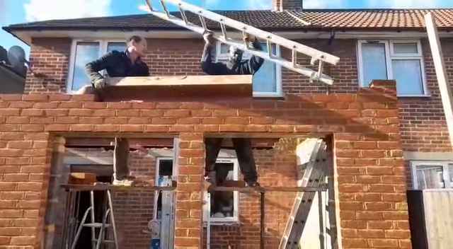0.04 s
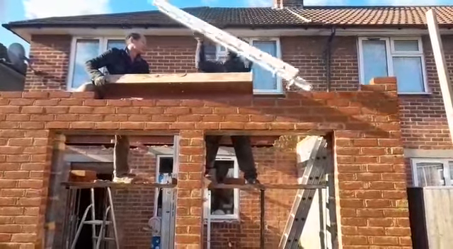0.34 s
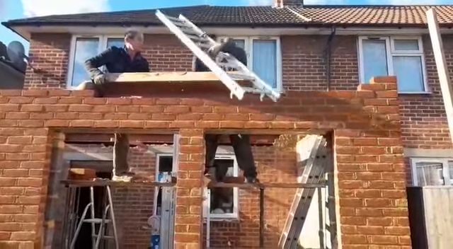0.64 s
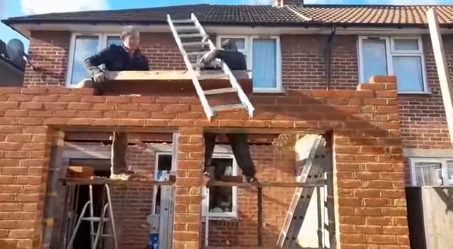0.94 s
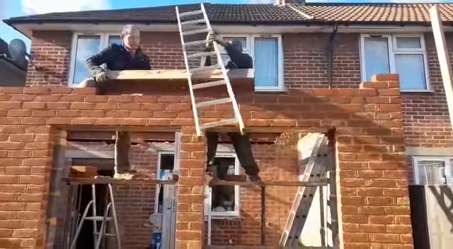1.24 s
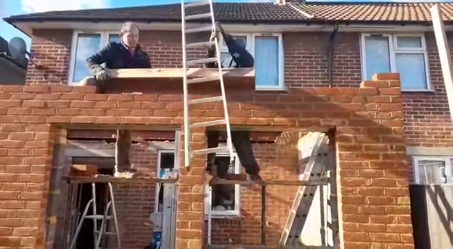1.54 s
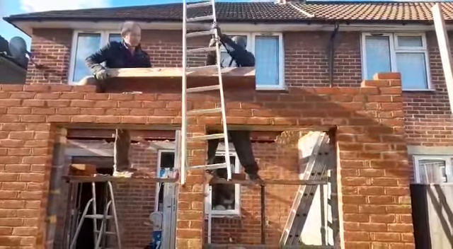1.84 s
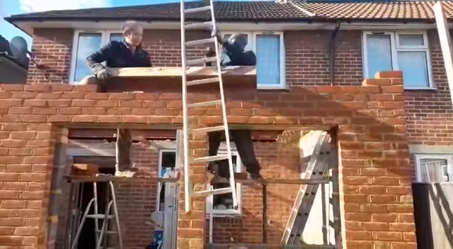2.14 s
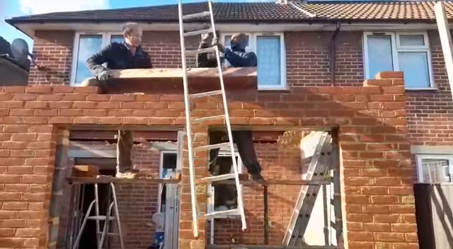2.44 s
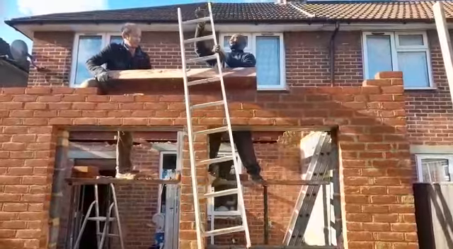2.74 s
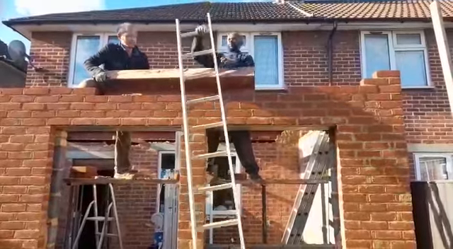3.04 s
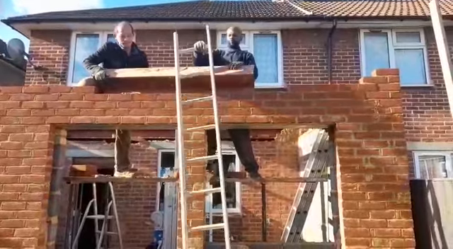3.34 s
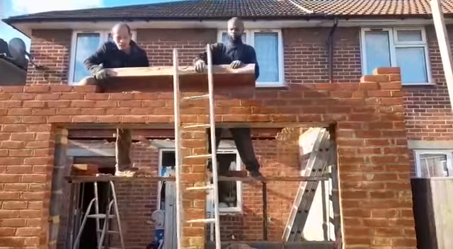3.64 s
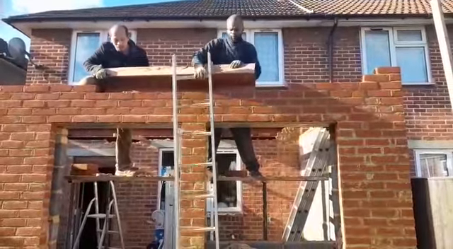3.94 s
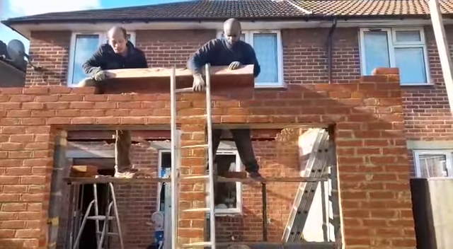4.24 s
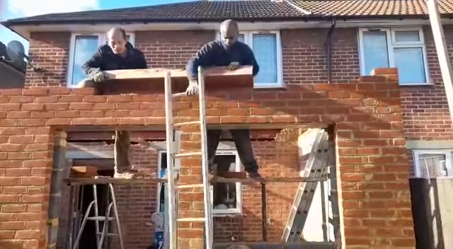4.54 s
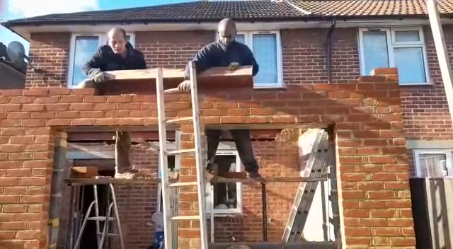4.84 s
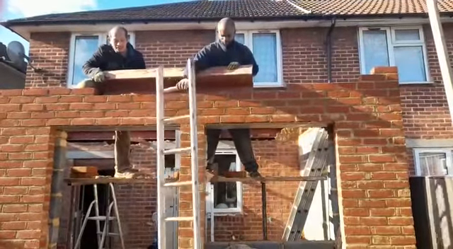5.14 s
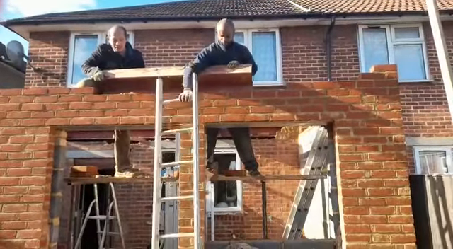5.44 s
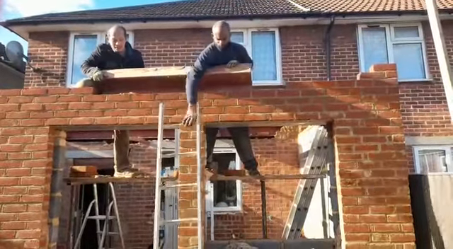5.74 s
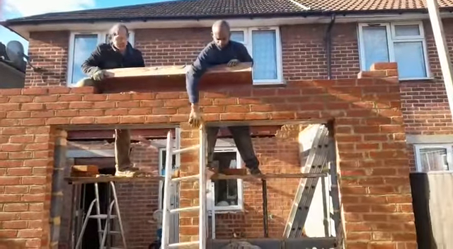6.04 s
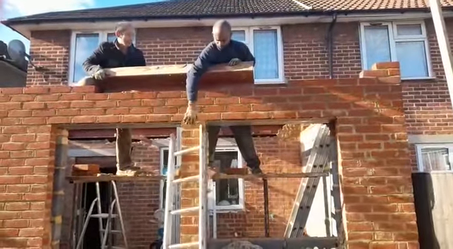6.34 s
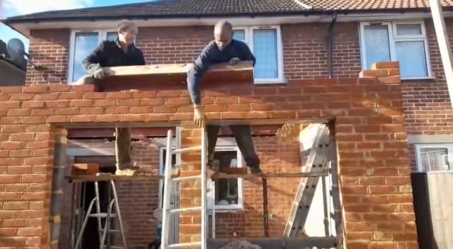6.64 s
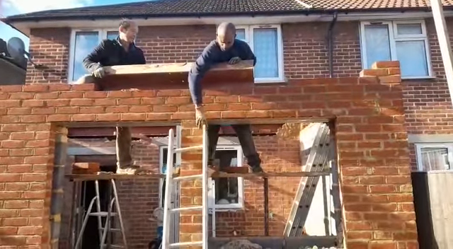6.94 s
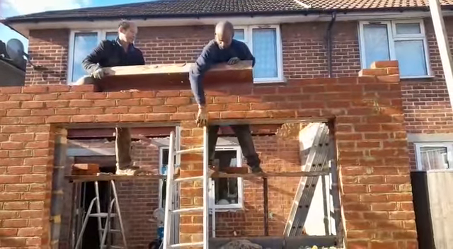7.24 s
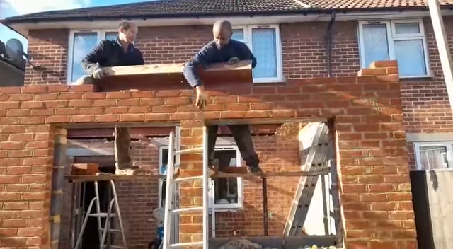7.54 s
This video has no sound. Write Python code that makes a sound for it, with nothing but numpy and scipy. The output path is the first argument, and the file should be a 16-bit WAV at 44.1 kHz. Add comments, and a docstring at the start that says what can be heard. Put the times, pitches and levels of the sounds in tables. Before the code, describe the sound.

Ringing metal knocks open the scene as an aluminium ladder bumps a brick wall, then rasps and rattles down it to a hard clank. Lighter knocks and dull boot thumps on boards follow. The ladder hits the ground with a thud and a bouncing clatter, scuffs briefly and settles with a few short clanks. It is heard in stereo in a walled yard, with faint town hum, hiss and low rumble underneath.

```python
"""A building site: an aluminium ladder is lowered over a brick wall.
Knocks ring its hollow rails and its rung joints tick. The rails scrape down the bricks in tiny
slips, crushing grains, chipping edges and snagging on mortar. Scaffold boards thump under boots.
The feet land with a boom and the ladder clanks into place. The yard walls add a short echo;
distant town, hiss and a low rumble lie underneath."""
import sys
import numpy as np
from scipy import signal
from scipy.fft import rfft, irfft
from scipy.io import wavfile
from scipy.ndimage import map_coordinates

SR = 44100
rng = np.random.default_rng(int(sys.argv[2]) if len(sys.argv) > 2 else 0)


def output_pcm(signal):
    """Save a mono or channel-first signal as 16-bit PCM at the path in sys.argv[1].

    Samples are clipped to [-1, 1] before scaling.
    """
    pcm = np.clip(np.atleast_2d(signal).T, -1, 1) * 32767
    wavfile.write(sys.argv[1], SR, np.round(pcm).astype(np.int16))


N = 334719
LN_1000 = np.log(1000)  # 60 dB of decay

# Likeness of the left and right channels. Each row: frequency in Hz, coherence 0-1.
COHERENCE = [(50, 0.74), (150, 0.35), (500, 0.71), (1500, 0), (5000, 0.11), (14000, 0)]
# Distant town and hiss. Each row: frequency in Hz, relative level in dB.
AIR_SPECTRUM = [(15, -56), (25, -16.5), (70, -2), (170, -15), (335, -8.5), (641, -21), (714, -21),
                (1160, -27), (2350, -24), (2610, -24), (2840, -26.5), (6210, -18), (8590, -32.5),
                (12900, -17.5), (16000, -28.5)]
# Treble of that background. Each row: time in seconds, gain in dB.
HISS_CURVE = [(.2, -5), (.6, -8.5), (.88, -7.5), (1.3, -4.5), (4.8, -2.5), (5, -10.5), (5.3, -5.5),
              (7.3, 0), (7.59, -13.5)]
# Low rumble. Each row: time in seconds, relative level in dB.
RUMBLE_CURVE = [(0.0, -55.5), (0.59, -65.5), (1.24, -42), (2.68, -59.5), (3.63, -53.5), (4.2, -62.5),
                (6.04, -60), (6.15, -52), (6.98, -72), (7.59, -88)]
# Ladder knocks on wall and boards. Each row: start in seconds, relative level in dB, brightness in dB,
# frequency favoured by the contact point in Hz, clear ring in dB, looseness as a decay time factor.
LADDER_KNOCKS = [(.3, -55, -10, 1750, 14.5, 1.6), (0.373, -49, -20, 2660, 19.5, 3.6),
                 (.936, -19.5, -13.5, 1085, -11, 1.02), (1.139, -16.5, -16, 1360, -3.5, 1.6),
                 (1.299, -20, -10.5, 5416, 10, 0.98), (1.361, -28, -6, 928, -1, 0.73),
                 (1.453, -22, -11, 928, 1, 0.48), (1.535, -28, -12, 1118, 7, .6),
                 (2.014, -34, -20, 1085, 14.5, 0.36), (2.16, -27.5, -10, 1265, 6, .6),
                 (2.295, -31, 3, 3950, 18, 0.49), (2.417, -21, -1, 3950, 12, 0.37),
                 (2.595, -23.5, 1, 2067, 9, 0.24), (2.932, -29, -7.5, 2137, 2, 0.33),
                 (2.954, -28.5, 1.5, 6169, 8, 0.42), (3.029, -18.5, -7, 1265, 2, 0.43),
                 (3.092, -18.5, -1, 1455, -3, 0.66), (3.146, -26, -20, 1455, -4, 0.98),
                 (3.243, -36, -15, 2067, 15.5, 0.78), (3.298, -38, -11, 2600, 22.5, 1.3),
                 (3.435, -32, -2, 1265, 7.5, 1.2), (3.499, -36.5, -8, 1265, 14.5, 1.1),
                 (3.56, -33, -14, 1380, 10, 0.98), (3.585, -29.5, -7, 2600, 9, 0.8),
                 (3.753, -22.5, -7, 678, -6, 0.85), (3.798, -5, -17.5, 1455, -1, 0.58),
                 (3.804, -20, -24, 1114, 10, 0.51), (3.829, -15.5, -16.5, 2138, 12.5, 0.38),
                 (3.832, -26.5, -24, 735, 5, 1.24), (3.843, -33, -9, 922, 9, 1.2),
                 (3.876, -30, -10.5, 6585, 20, 0.74), (4.161, -17, -18.5, 1455, -13, 0.98),
                 (4.228, -19, -21, 1085, -1, 0.8), (4.241, -26.5, -27, 1455, 6, 0.7),
                 (4.334, -34.5, -10, 2995, -1, 0.56), (4.366, -33, -18, 2467, -11, 0.43),
                 (4.584, -35, -7.5, 2467, -5, 0.28), (4.661, -42.5, -10, 2467, -2, 0.2),
                 (4.685, -29, -10, 743, -4.5, 0.81), (5.087, -50.5, 4, 4400, 6.5, 1),
                 (5.44, -49, -12, 743, 12, 0.63), (5.892, -41.5, -8, 928, 6, 2.1),
                 (6.004, -17, -12.5, 2067, -7, 1.8), (6.03, -17, -18.5, 1600, -1, 1.9),
                 (6.088, -29, -18, 678, 10, 2.4), (6.113, -14.5, -15, 1114, -1.5, 1.53),
                 (6.219, -16.5, -11, 1114, 3, 0.92), (6.226, -24, -18.5, 4090, 21, 0.65),
                 (6.234, -32, -22, 1380, 18, 0.5), (6.269, -29, -5, 1118, 8, 1.2),
                 (6.435, -32.5, -12, 2440, -23, 0.19), (6.576, -17, -34, 1114, -10, 0.27),
                 (6.622, -12.5, -8.5, 1380, -5, 0.23), (7.066, -36, -8, 1114, -2, 0.22),
                 (7.271, -16, -4, 1265, 9, 0.29), (7.279, -16.5, -11, 1152, 2, 0.29),
                 (7.288, -14.5, -16.5, 1244, 1, 0.36), (7.3, -35, -8, 678, 12, 0.82),
                 (7.363, -54, 11.5, 6585, 5, 0.24)]
# Clear modes of rails and rungs. Each row: frequency in Hz, relative level in dB, base t60 in seconds.
LADDER_MODES = [(525, -11, .33), (614, -11, .45), (678, -6, .36), (735, -5, .4), (922, -4, .4),
                (1085, -5, .3), (1114, -4, .38), (1152, -9, .2), (1244, -11, 1.45), (1265, -5, .3),
                (1360, -7, .28), (1455, -3, .35), (1545, -9, .24), (1600, -12, .22), (1750, -9, .24),
                (1820, -8, .26), (1914, -7, .2), (2067, -8, .15), (2138, -5, .16), (2467, -7, .24),
                (2600, -10, .22), (2650, -13, .2), (2995, -14, .16), (3200, -11, .22), (3450, -12, .18),
                (3950, -10, .16), (4090, -9, .18), (4400, -10, .16), (5416, -12, .14), (5567, -13, .15),
                (6169, -12, .16), (6585, -13, .17)]
# Dense modes after a knock. Each row: frequency in Hz, relative level in dB.
CLATTER_SPECTRUM = [(60, -37), (200, -13.5), (450, -8), (700, -3), (1300, 0.5), (1750, -12), (2300, -6),
                    (3300, -6.5), (4500, -3), (6500, -0.5), (11000, -8.5), (15000, -13)]
# Decay of the dense modes. Each row: frequency in Hz, base t60 in seconds.
CLATTER_DECAY = [(200, 0.32), (700, 0.31), (1600, 0.25), (3500, 0.21), (6500, 0.17), (12000, 0.19)]
# Mode clusters of the hollow rails. Each row: centre in Hz, half width in Hz, gain in dB.
RAIL_CLUSTERS = [(609, 41, 5), (695, 31, 7.5), (928, 30, 6.5), (1020, 21, -1), (1464, 77, 5),
                 (1868, 200, 7), (2110, 180, 6.5), (2530, 203, 7.5), (3064, 190, 7.5), (3980, 240, 2.5),
                 (5980, 84, -4.5), (6470, 170, 0)]
# Rails rubbing on brick. Each row: frequency in Hz, relative level in dB.
SCRAPE_SPECTRUM = [(80, -54.5), (300, 10), (480, 2.5), (800, 0), (1350, 1.5), (1750, -7.5), (2300, -4),
                   (3500, -2.5), (4400, 0), (6500, 3), (10000, -4), (13000, -2), (15500, -8)]
# Ladder shifts or slips through gloves.
# Each row: start in seconds, length in seconds, relative level in dB, brightness in dB.
SHORT_SCUFFS = [(0.379, 0.035, -52.5, 7.5), (0.541, 0.095, -54.5, -1), (1.058, 0.29, -44.5, -0.5),
                (3.96, 0.2, -42, -9.5), (4.476, 0.11, -38.5, 3.5), (5.855, 0.14, -47, 5.5),
                (6.515, 0.56, -37.5, 4.5)]
# Two slides down the bricks, a list each.
# Each row: time in seconds, relative level in dB, brightness in dB.
LONG_SLIDES = [
    [(1.43, -38.5, -19), (1.47, -34.5, -2), (1.66, -31, 4), (1.88, -39, -4), (2.08, -36, 1.5),
     (2.25, -31.5, 2.5), (2.45, -31, 5), (2.51, -41.5, -1), (2.62, -40.5, 5), (2.69, -44.5, -1.5),
     (2.77, -42, 3.5), (2.9, -45.5, 0)],
    [(2.972, -37.5, 4), (3.0, -26.5, 9), (3.1, -27.5, 4.5), (3.18, -38.5, 1.5), (3.34, -34.5, 5.5),
     (3.44, -41, 6.5), (3.51, -37.5, 2.5), (3.58, -35, 2.5), (3.67, -38, -6), (3.73, -31, -2),
     (3.78, -36, -22)],
]
# Scrape colour as the contact travels. Each row: time in seconds, hollow rasp in dB, bass in dB.
RASP_CURVE = [(1.5, 9, 0), (2.2, 7, -10), (2.9, 8.5, 7.5), (3.05, 9, -11), (3.3, 12, -9), (3.55, 5.5, 0),
              (3.8, -1.5, 6.5)]
# Hollow resonances of the rasp. Each row: centre in Hz, half width in Hz, share 0-1.
RASP_RESONANCES = [(1330, 225, 0.5), (2020, 92, 0.3), (2590, 87, 0.1)]
# Dull thumps: boots on boards, and the ladder's feet settling at the end. Each row: start in seconds, relative
# level in dB, pitch in Hz, t60 in seconds.
DULL_THUMPS = [(0.906, -24.5, 133, 0.13), (1.086, -14, 263, 0.024), (1.149, -20, 62, 0.096),
               (1.158, -23.5, 375, 0.17), (1.344, -27, 367.5, 0.089), (1.365, -19, 119, 0.078),
               (1.384, -20, 258, 0.087), (1.852, -29, 88, 0.35), (1.949, -24.5, 90, 0.29),
               (2.482, -20, 61.5, 0.15), (3.671, -23.5, 86, 0.19), (3.71, -8.5, 123, 0.057),
               (3.91, -29, 113, 0.13), (3.964, -25, 94.2, 0.077), (4.543, -20, 82, 0.097),
               (4.875, -23.5, 68.5, 0.096), (6.138, -20, 100, 0.11), (6.62, -20.5, 263, 0.067),
               (6.995, -34, 69.5, 0.1), (7.283, -26.5, 111, 0.21), (7.396, -22.5, 103, 0.049)]
# A metal edge bites into brick. Each row: start in seconds, relative level in dB.
BRICK_SNAPS = [(1.299, -21), (2.955, -38), (3.097, -25), (4.162, -36), (4.687, -28), (6.219, -18)]
# A rail snags on mortar or grit. Each row: start in seconds, relative level in dB.
RAIL_CATCHES = [(1.434, -44), (1.548, -28), (1.637, -29), (1.69, -26), (2.019, -30.5), (2.201, -33),
                (2.228, -21.5), (2.355, -25), (2.552, -28.5), (2.814, -36.5), (3.031, -23), (3.415, -26),
                (3.437, -30.5), (6.562, -36), (6.735, -31.5), (7.012, -37)]
# Feet land. Each row: start in seconds, relative level in dB, thud pitch in Hz, thud gain in dB.
FOOT_LANDINGS = [(6.03, -7.5, 401, -3.5), (6.182, -19, 467, -0.5), (6.194, -20.5, 390, -0.5),
                 (6.225, -19, 294, 1), (6.236, -29, 428, 2), (6.271, -33, 290, 2)]
# Boom of ground and feet. Each row: frequency in Hz, relative level in dB, t60 in seconds.
BOOM_MODES = [(83.8, -13, 0.37), (127, 0.5, 0.069), (178.4, 4, 0.06), (279.3, -12, 0.22)]
# Microphone: thin deep bass, a hollow in the treble. Each row: frequency in Hz, gain in dB.
MIC_RESPONSE = [(20, -44), (40, -2.5), (65, -3), (6600, 4), (7400, -8.5), (8200, -21), (9000, -7.5),
                (10200, -6), (11200, 0.5)]


def amp(db):
    """Decibels to gain."""
    return 10 ** (np.asarray(db) / 20)


def unit(x):
    """Scales to rms 1."""
    return x / np.sqrt(np.mean(x ** 2) + 1e-20)


def decay(t, t60_s):
    """Exponential fall, 60 dB in t60_s."""
    return np.exp(-LN_1000 * t / t60_s)


def log_interp(points, hz):
    """Reads a table on a log-frequency axis."""
    table_hz, value = np.transpose(points)
    return np.interp(np.log(hz + 1), np.log(table_hz + 1), value)


def freqs(n):
    """Bin frequencies of n samples."""
    return np.fft.rfftfreq(n, 1 / SR)


def treble(hz, corner_hz=3000):
    """High-pass gain, 0-1."""
    return 1 / (1 + (corner_hz / (hz + 1)) ** 4)


def bass(hz, corner_hz):
    """Low-pass gain, 0-1."""
    return 1 - treble(hz, corner_hz)


def add(mix, start_s, sound):
    """Mixes in a stereo sound."""
    part = mix[:, round(start_s * SR):][:, :sound.shape[1]]
    part += sound[:, :part.shape[1]]


def wander(rate_hz):
    """Random motion of rms 1, up to about rate_hz."""
    return unit(irfft(rfft(rng.standard_normal(N)) / (1 + (freqs(N) / rate_hz) ** 4), N))


def noise_spectra(n, lead_s=95e-6):
    """Partly coherent stereo noise spectra; the left leads."""
    hz = freqs(n)
    common, separate = rfft(rng.standard_normal((2, n)))
    coherence = log_interp(COHERENCE, hz)
    left = common * np.exp(2j * np.pi * hz * lead_s)
    right = coherence * common + np.sqrt(1 - coherence ** 2) * separate
    return np.array([left, right])


def outdoors(air_db=-47, rumble_db=3, lump_db=3, low_hz=54, high_hz=190, pan_db=4):
    """Distant town and hiss over a lumpy rumble of breeze and handling."""
    hz, t = freqs(N), np.arange(N) / SR
    air = amp(air_db) * unit(irfft(noise_spectra(N, lead_s=0) * amp(log_interp(AIR_SPECTRUM, hz)), N))
    hiss = irfft(rfft(air) * treble(hz), N)
    air += hiss * (amp(np.interp(t, *np.transpose(HISS_CURVE))) - 1)
    rumble = unit(irfft(noise_spectra(N) * treble(hz, low_hz) / (1 + (hz / high_hz) ** 3), N))
    rumble *= amp(np.interp(t, *np.transpose(RUMBLE_CURVE)) + rumble_db + lump_db * wander(rate_hz=11))
    return air + rumble * amp([[pan_db], [-pan_db]])


def clatter(colour_db, t60_scale, ripple_db, hold_s=0.0035, lead_s=1e-4, size=16384, knots=420):
    """Dense, clustered rail modes after one blow; the high ones die first."""
    hz, t = freqs(size), np.arange(size) / SR
    clusters_db = sum(db * np.exp(-((hz - centre) / width) ** 2) for centre, width, db in RAIL_CLUSTERS)
    ripple = np.interp(hz, np.linspace(0, SR / 2, knots), rng.standard_normal(knots)) * treble(hz, 610)
    shape_db = colour_db + clusters_db + ripple_db * np.minimum(ripple, 1.5)
    spectra = noise_spectra(size, lead_s) * amp(shape_db)
    spectra /= np.std(irfft(spectra * ((hz > 500) & (hz < 3000))))
    centres_hz, t60s = np.transpose(CLATTER_DECAY)
    bands = [log_interp(np.c_[centres_hz, row], hz) for row in np.eye(len(t60s))]
    fading_s = np.maximum(t - hold_s, 0)  # the blow first runs the length of the rails
    return sum(irfft(spectra * band) * decay(fading_s, t60 * t60_scale) for band, t60 in zip(bands, t60s))


def clang(weights_db, t60_scale, free=False, held_t60_s=0.25, lead_s=74e-6, beat_hz=13, size=16384):
    """Clear modes, weighted by the place of the blow; hands and wall damp all but the free one."""
    hz, db, t60_s = np.transpose(LADDER_MODES)
    t60_s = np.where(free, t60_s * t60_scale, np.minimum(t60_s * t60_scale, held_t60_s))
    t = np.arange(size) / SR
    phase = rng.uniform(0, 2 * np.pi, len(hz))
    phasors = np.exp(1j * np.array([phase + 2 * np.pi * hz * lead_s, phase]))
    modes = np.exp(np.outer(2j * np.pi * hz - LN_1000 / t60_s, t))
    modes *= 1 + 0.31 * np.outer(free, np.exp(2j * np.pi * beat_hz * t))  # the two rails beat
    return ((phasors * amp(db + weights_db)) @ modes).real


def contact_crack(pulse_hz, lead_s=1e-4, size=16384):
    """The blow itself: one push and pull, each under a millisecond."""
    phase = 2 * np.pi * pulse_hz * (np.arange(size) / SR + np.array([[lead_s], [0]]) - 0.001)
    return phase * np.exp(-phase ** 2 / 2)


def knocks(clatter_db=-12, clang_db=-17, crack_db=-3, firm_db=-19, favour_octaves=0.22,
           chatter_s=0.0026, glance_s=0.009, glance_db=-40, sudden_s=0.0042, size=16384):
    """Blows excite dense and clear modes; a loose ladder rings on, a pinned one stops short."""
    out, hz, t = np.zeros((2, N)), freqs(size), np.arange(size) / SR
    mode_hz = np.transpose(LADDER_MODES)[0]
    top = treble(hz) + 0.83 * treble(hz, 9500)
    for start_s, db, bright_db, favoured_hz, clear_db, looseness in LADDER_KNOCKS:
        # A loose ladder chatters into contact; a sliding one glances.
        rise_s = chatter_s * looseness + glance_s * min(sliding(start_s) / amp(glance_db), 1)
        bass_db = 17 - 3 * max(db - firm_db, 0)  # hard blows go into the ring, not the bass
        tilt_db = bass_db * bass(hz, 480) + (bright_db + 11) * top
        free_hz = mode_hz[np.argmin(abs(mode_hz - favoured_hz))]
        near = np.exp(-(np.log2((hz + 1) / free_hz) / favour_octaves) ** 2)
        colour_db = log_interp(CLATTER_SPECTRUM, hz) + tilt_db + 3 * near
        sound = amp(clatter_db) * clatter(colour_db, looseness, ripple_db=2.5)
        weights_db = np.interp(mode_hz, hz, tilt_db + (8 + max(clear_db, 0)) * near + min(clear_db, 0))
        sound += amp(clang_db) * clang(weights_db, 0.7 * looseness ** 0.9, free=mode_hz == free_hz)
        sound *= np.minimum(t / rise_s, 1)
        sound += amp(crack_db) * np.exp(-(rise_s / sudden_s) ** 2) * contact_crack(free_hz)
        add(out, start_s, amp(db) * sound)
    return out


def strokes(peak_share=0.097, swell_db=4, fade_db=24):
    """Every slide and scuff as rows of time in seconds, level in dB, brightness in dB."""
    shape = [(0, -swell_db), (peak_share, 0), (1, -fade_db)]
    scuffs = [[(start_s + share * length_s, db + step_db, bright_db) for share, step_db in shape]
              for start_s, length_s, db, bright_db in SHORT_SCUFFS]
    return list(LONG_SLIDES) + scuffs


def sliding(time_s):
    """Strength of the sliding contact; zero between strokes."""
    return sum(np.interp(time_s, at_s, amp(db), left=0, right=0)
               for at_s, db, _ in map(np.transpose, strokes()))


def rung_ticks(rest_db=-66, shake_db=-13, spread_db=5.5, rise_s=0.0027, count=44, size=16384):
    """Loose rung joints tick at random, louder when sliding shakes them."""
    out, t = np.zeros((2, N)), np.arange(size) / SR
    colour_db = log_interp(SCRAPE_SPECTRUM, freqs(size))
    for place, softness in rng.random((count, 2)):
        start_s = place * N / SR
        tick = clatter(colour_db, t60_scale=0.27, ripple_db=1.5, hold_s=0) * np.minimum(t / rise_s, 1)
        shake = amp(rest_db) + amp(shake_db) * sliding(start_s)
        add(out, start_s, shake * amp(-spread_db * np.log(softness + 0.034)) * tick)
    return out


def stick_slip(slips_per_s=1300, spread_db=2.4, judder_db=2, judder_hz=35, hop_hz=22,
               clang_db=-18, tick_s=0.00037, points=9, size=16384):
    """Grit catches and lets go; each slip rings the ladder from a hopping contact point."""
    t = np.arange(size) / SR
    slips = (rng.random(N) < slips_per_s / SR) * rng.choice([-1, 1], N)
    slips = slips * amp(spread_db * np.minimum(rng.exponential(1, N), 5) + judder_db * wander(judder_hz))
    contact = np.argmax([wander(hop_hz) + 0.6 * rng.standard_normal(N) for _ in range(points)], axis=0)
    colour_db = log_interp(SCRAPE_SPECTRUM, freqs(size))
    out = np.zeros((2, N))
    for point in range(points):
        body = clatter(colour_db, t60_scale=0.6, ripple_db=2.5, lead_s=70e-6)
        body *= 1 + 4 * np.exp(-t / tick_s)  # the contact ticks ahead of the ring
        body += amp(clang_db) * clang(1.7 * rng.standard_normal(len(LADDER_MODES)), t60_scale=0.5)
        out += signal.oaconvolve((slips * (contact == point))[None], body, axes=1)[:, :N]
    return out


def shift_resonances(x, patch_db=3.1, patch_hz=150, patch_s=0.045, size=512):
    """Resonances swell and give way as the contact travels along the rails."""
    hz, t, spectra = signal.stft(x, SR, nperseg=size)
    grid = np.meshgrid(hz / patch_hz, t / patch_s, indexing="ij")
    patches = unit(map_coordinates(rng.standard_normal((size, size)), grid, order=1, mode="mirror"))
    return signal.istft(spectra * amp(patch_db * np.minimum(patches, 2)), SR, nperseg=size)[1][:, :N]


def scraping(gain_db=-5, heavy_db=-32, touch_s=0.025):
    """Slides and scuffs: a hollow grind plus hiss; light contact favours the very top."""
    t, hz = np.arange(N) / SR, freqs(N)
    friction = rfft(shift_resonances(stick_slip()))
    grind = unit(irfft(friction * bass(hz, 3000), N))
    hiss = unit(irfft(friction * treble(hz), N))
    fizz = irfft(rfft(hiss) * treble(hz, 4700), N)
    rasp_s, rasp_db, bass_db = np.transpose(RASP_CURVE)
    hollow = sum(share * np.exp(-((hz - centre) / width) ** 2) for centre, width, share in RASP_RESONANCES)
    for band, db in (hollow, rasp_db), (bass(hz, 520), bass_db):
        grind += irfft(rfft(grind) * band, N) * (amp(np.interp(t, rasp_s, db)) - 1)
    out = np.zeros((2, N))
    for at_s, db, bright_db in map(np.transpose, strokes()):
        touching = np.clip(np.minimum(t - at_s[0], at_s[-1] - t) / touch_s + 1, 0, 1)
        level_db = np.interp(t, at_s, db)
        lightness = np.clip((heavy_db - level_db) / 20, 0, 1)
        top = (hiss + lightness * fizz) * amp(np.interp(t, at_s, bright_db))
        out += touching * amp(level_db + gain_db) * (grind + top)
    return out


def brick_crunch(gain_db=-9, grains_per_s=110, spread_db=7.5, corner_hz=4500, t60_s=0.036, size=1024):
    """Grains of brick burst under the sliding rails."""
    t = np.arange(size) / SR
    bursts = (rng.random(N) < grains_per_s / SR) * amp(spread_db * np.minimum(rng.exponential(1, N), 4))
    grain = irfft(noise_spectra(size) * treble(freqs(size), corner_hz)) * decay(t, t60_s)
    crunch = unit(signal.oaconvolve(bursts[None], grain, axes=1)[:, :N])
    return amp(gain_db) * crunch * sliding(np.arange(N) / SR)


def dull_thumps(rise_s=0.0072, knock_db=-7, knock_hz=300, min_t60_s=0.03, pan_db=1, size=16384):
    """A board flexes under a boot, or a ladder foot settles: a few slow cycles and a woolly knock."""
    out, t = np.zeros((2, N)), np.arange(size) / SR
    for start_s, db, hz, t60_s in DULL_THUMPS:
        knock = unit(irfft(noise_spectra(size) * bass(freqs(size), knock_hz)))
        flex = np.sin(2 * np.pi * hz * t) + amp(knock_db) * knock
        envelope = (1 - np.exp(-t / rise_s)) * decay(t, max(t60_s, min_t60_s))
        add(out, start_s, amp(db) * flex * envelope)
    return out * amp([[pan_db], [-pan_db]])


def brick_snaps(gain_db=-3, corner_hz=7500, t60_s=0.089, size=8192):
    """A chip of brick breaks off with a short, bright crack."""
    out, t = np.zeros((2, N)), np.arange(size) / SR
    for start_s, db in BRICK_SNAPS:
        chip = unit(irfft(noise_spectra(size) * treble(freqs(size), corner_hz)))
        add(out, start_s, amp(db + gain_db) * chip * decay(t, t60_s))
    return out


def rail_catches(gain_db=-15, bright_db=4, bass_db=-7, snap_s=0.00023, size=16384):
    """A rail snags and breaks free: a gritty snap and a damped ring."""
    out, hz, t = np.zeros((2, N)), freqs(size), np.arange(size) / SR
    colour_db = log_interp(SCRAPE_SPECTRUM, hz) + bright_db * treble(hz) + bass_db * bass(hz, 600)
    for start_s, db in RAIL_CATCHES:
        body = clatter(colour_db, t60_scale=0.5, ripple_db=5.5, hold_s=0.0097)
        add(out, start_s, amp(db + gain_db) * body * (1 + 4 * np.exp(-t / snap_s)))
    return out


def foot_landings(grit_db=-17, grit_hz=550, grit_t60_s=0.29, thud_t60_s=0.069, rise_s=0.004, size=16384):
    """The feet hit the ground, bounce and settle: boom, pitched thud and dull grit."""
    out, t = np.zeros((2, N)), np.arange(size) / SR
    boom = sum(amp(db) * np.sin(2 * np.pi * hz * t) * decay(t, t60_s) for hz, db, t60_s in BOOM_MODES)
    for start_s, db, thud_hz, thud_db in FOOT_LANDINGS:
        grit = unit(irfft(noise_spectra(size) * bass(freqs(size), grit_hz))) * decay(t, grit_t60_s)
        thud = np.sin(2 * np.pi * thud_hz * t) * decay(t, thud_t60_s)
        impact = boom + amp(thud_db) * thud + amp(grit_db) * grit
        add(out, start_s, amp(db) * impact * np.minimum(t / rise_s, 1))
    return out


def yard_echo(x, wet_db=-13, t60_s=0.27, dull_hz=5000, delay_s=0.0063, size=32768):
    """Brick walls add a short, dull echo."""
    t = np.arange(size) / SR
    tail = irfft(rfft(rng.standard_normal((2, size))) / (1 + (freqs(size) / dull_hz) ** 2))
    tail *= decay(t, t60_s) * (t > delay_s)
    return x + amp(wet_db) * signal.fftconvolve(x, tail / np.linalg.norm(tail[0]), axes=1)[:, :N]


def scene(pan_db=0.24):
    """Ladder and boards in the yard, coloured by the microphone, plus the background."""
    ladder = knocks() + scraping() + rail_catches() + brick_snaps() + brick_crunch() + rung_ticks()
    yard = yard_echo(ladder * amp([[pan_db], [-pan_db]]) + dull_thumps() + foot_landings())
    mic_gain = amp(log_interp(MIC_RESPONSE, freqs(2 * N)))
    return irfft(rfft(yard, 2 * N) * mic_gain)[:, :N] + outdoors()


def record(dry, cutoff_hz=15950):
    """Steep low-pass band limit."""
    taps = signal.firwin(255, cutoff_hz, window=("kaiser", 8), fs=SR)
    return signal.oaconvolve(dry, taps[None], "same", axes=1)


dry = scene()
out = record(dry)
output_pcm(out)
```